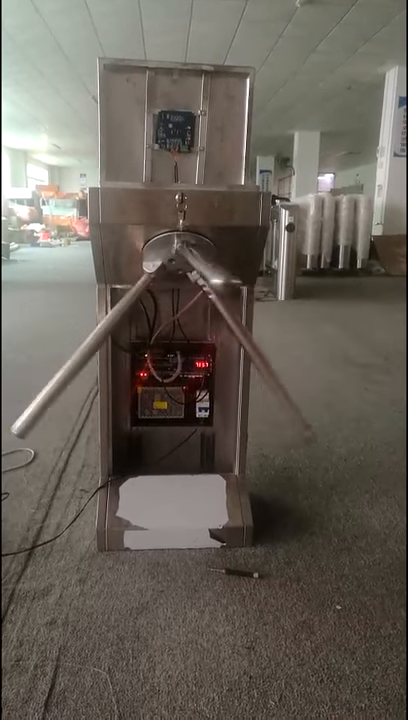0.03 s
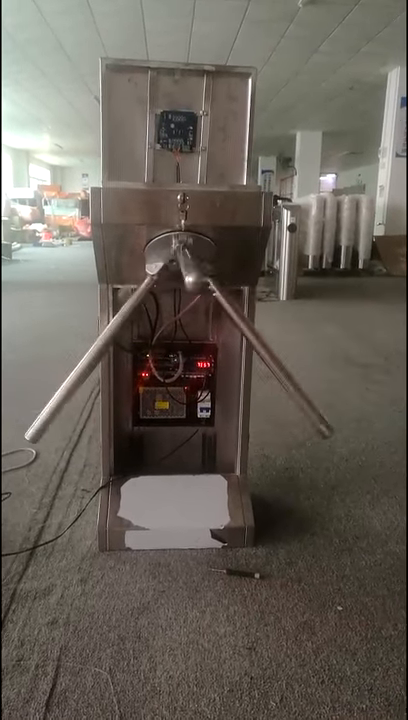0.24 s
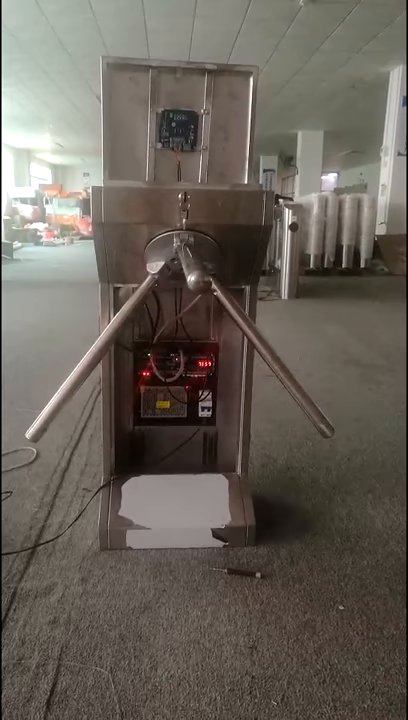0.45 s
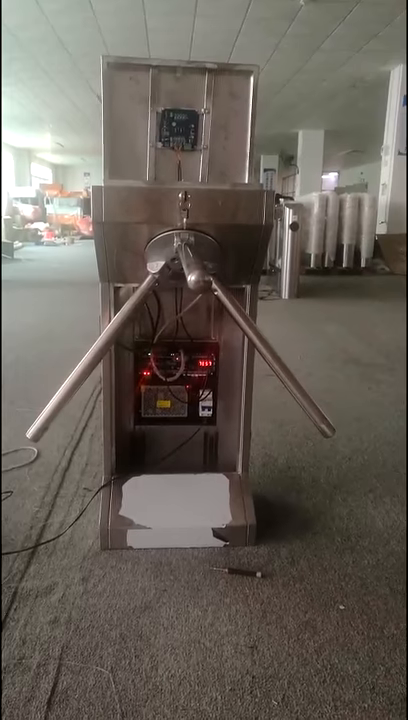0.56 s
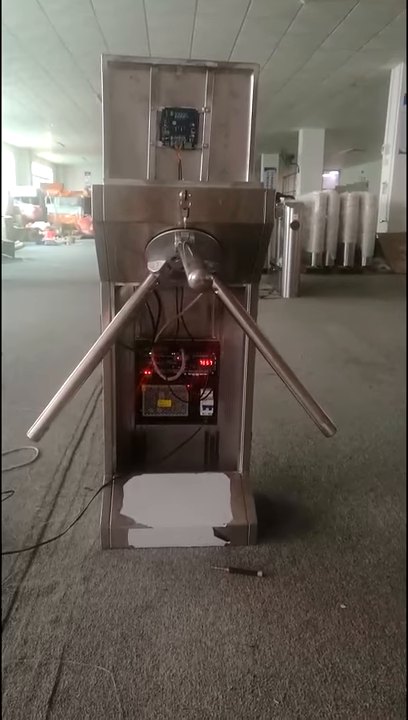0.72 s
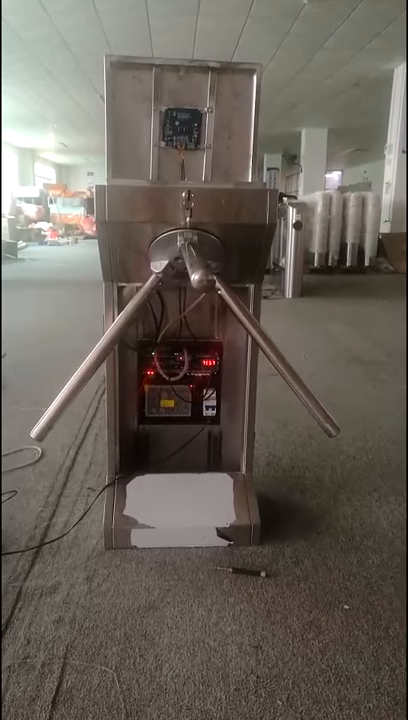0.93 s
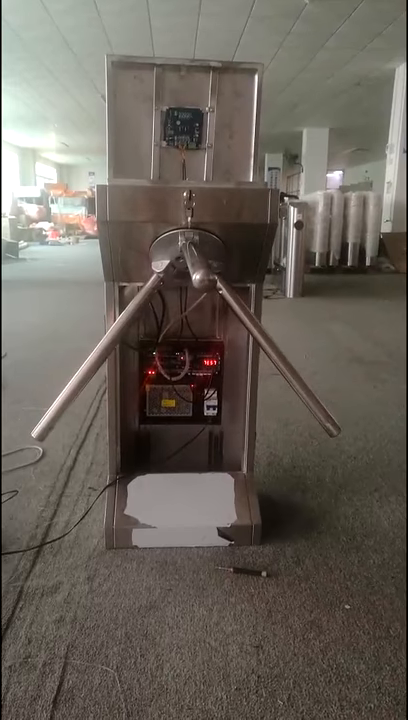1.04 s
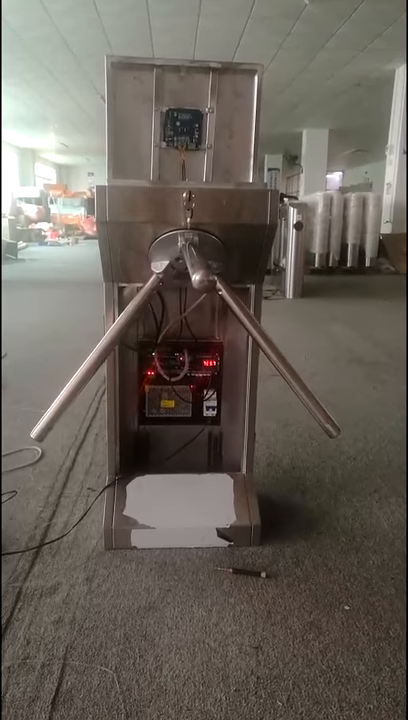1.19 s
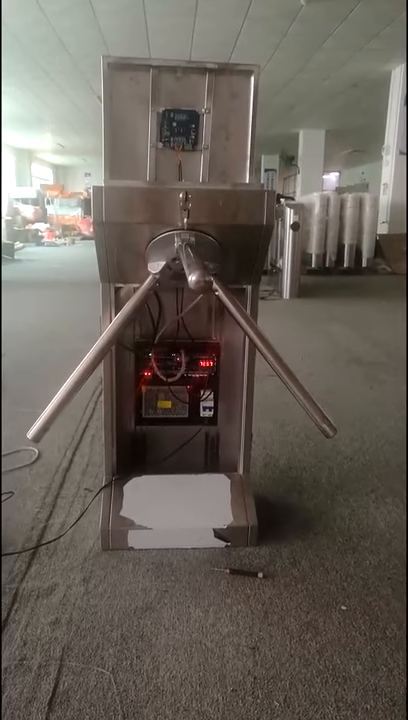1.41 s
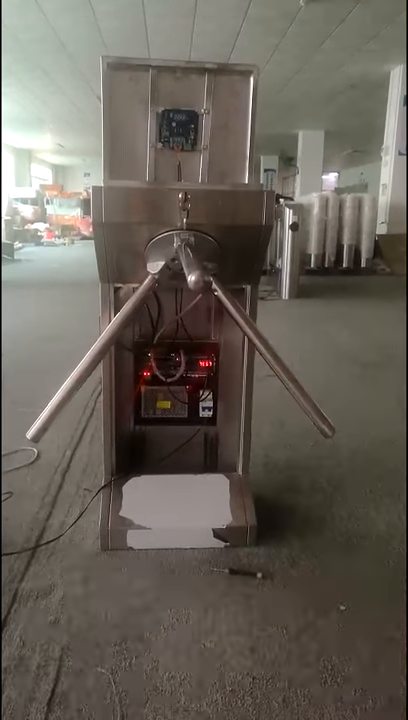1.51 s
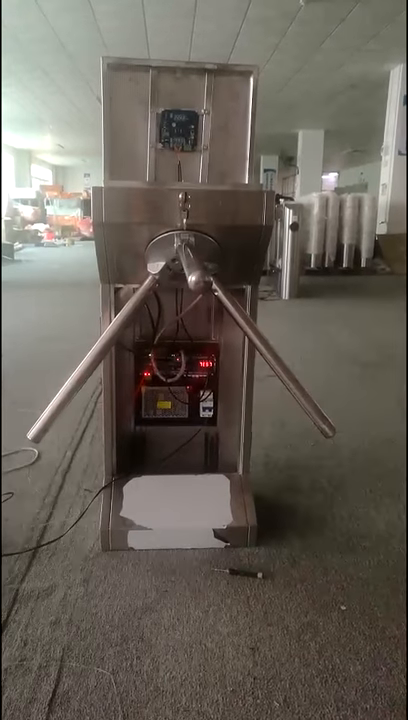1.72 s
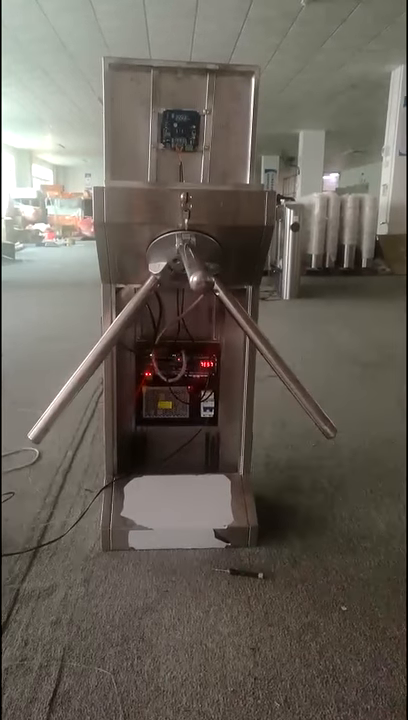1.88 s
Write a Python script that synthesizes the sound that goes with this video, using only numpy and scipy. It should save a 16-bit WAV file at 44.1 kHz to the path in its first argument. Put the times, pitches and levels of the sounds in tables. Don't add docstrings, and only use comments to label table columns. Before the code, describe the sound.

A steel turnstile knocks with a low thud, then clacks loudly over steady distant machine hum

```python
import sys
import numpy as np
from scipy import signal
from scipy.fft import rfft, irfft
from scipy.io import wavfile
from scipy.ndimage import uniform_filter1d

SR = 44100
rng = np.random.default_rng(int(sys.argv[2]) if len(sys.argv) > 2 else 0)


def log_audio(samples):
    frames = np.atleast_2d(samples).T
    limited = np.clip(frames, -1, 1)
    pcm = np.round(limited * 32767).astype(np.int16)
    wavfile.write(sys.argv[1], SR, pcm)


def gain_from_db(level_db):
    decades = np.asarray(level_db, float) / 20
    return 10 ** decades


N = 85995

# frequency in Hz, density in dB per Hz.
HUM_SPECTRUM = [(45, -26.5), (70, -1), (280, -1), (750, -9.5), (2700, -13.5), (4000, -24.5), (9800, -38.5),
                (14000, -44.5)]
# time in seconds, level in dB.
MACHINE_ACTIVITY = [(0, 3), (.2, 3.5), (0.499, 3.5), (.8, 0.5), (1.05, 2), (1.3, 3), (1.74, 2), (1.8, 3)]
# start in seconds, length in seconds, pitch in Hz, level in dB.
SQUEAKS = [
    (.03, .11, 1050, -46.5),
    (.115, 0.03, 1650, -40.5),
    (.45, 0.081, 1372, -49),
    (.53, .05, 1510, -50),
    (.6, 0.039, 1776, -38.5),
    (.645, 0.064, 1780, -46),
    (.5, .04, 1085, -50),
    (1.74, 0.09, 705, -42.5),
]
# start in seconds, frequency in Hz, peak in dB, rise in seconds,
# sharpness as an exponent.
PANEL_SWELLS = [(.195, 137, -19.5, 0.069, 1.5), (.2534, 137, -22.5, 0.063, 1.7),
                (.235, 188, -20, 0.027, 2.2), (.285, 170, -25.5, 0.039, 2.2), (.29, 188, -24.5, 0.029, 1.8),
                (.34, 196, -28.5, 0.03, 1.8), (.4, 142, -38, .04, 1.1), (0.196, 365, -36.5, 0.026, 1.2),
                (.2, 305, -34.5, 0.029, 1.2), (.21, 610, -39.5, 0.029, 1.8), (.335, 295, -32, 0.029, 0.93),
                (.25, 345, -33, .03, 1.2), (0.44, 190, -42.5, 0.036, 1.2), (0, 200, -32, 0.0051, .3),
                (1.335, 352, -25, 0.027, 1.8), (1.385, 315, -29, .02, 1.2), (1.447, 350, -25, 0.034, 1.5),
                (1.44, 535, -30, 0.019, 1.2), (1.44, 170, -33.5, 0.062, 1.8), (1.5, 157, -26.5, 0.017, 1.8),
                (1.53, 215, -28.5, 0.022, 1.8), (1.56, 350, -32, 0.028, 1.2)]
# start in seconds, peak in dB, rise in seconds, sharpness as an exponent.
RUMBLES = [
    (.195, -33.5, 0.043, 0.87),
    (.28, -47, 0.065, 1.8),
    (1.34, -31.5, 0.056, 1.5),
    (1.41, -30.5, 0.066, 1.6),
    (1.52, -35.5, 0.1, 1.46),
    (1.77, -42.5, 0.035, 1.7),
]
# frequency in Hz, level in dB.
RUMBLE_COLOUR = [(50, -31.5), (110, -5), (200, 2), (380, -0.5), (600, -6.5), (1000, -13.5), (2000, -48)]
# start in seconds, peak in dB, rise in seconds, sharpness as an exponent.
BEARING_RUBS = [
    (.1, -57.5, .06, 1.5),
    (.38, -57.5, 0.16, 0.78),
]
# frequency in Hz, level in dB.
BEARING_COLOUR = [(2500, -35), (4800, -4.5), (6800, -2.5), (8200, -13.5), (11000, -23)]

# frequency in Hz, level in dB, t60 in seconds.
PAWL_MODES = [(2602, 7.5, 0.026), (4610, 0.5, 0.046), (4700, -3, .03), (7400, 0, .012), (7500, 1, 0.014)]
# frequency in Hz, level in dB, t60 in seconds.
STOP_MODES = [(760, -2.5, 0.03), (1095, 2, 0.039), (1290, 4.5, 0.027), (1803, -0.5, 0.044),
              (2200, -9.5, .04), (4700, -7, .06), (5050, -6, .02), (6250, -12.5, .015), (9240, -27, .012),
              (12300, -21.5, .01)]
# frequency in Hz, level in dB, t60 in seconds.
REBOUND_MODES = [(6570, 1.5, 0.0087), (8900, -8, 0.01), (11100, -11, .006), (13500, -16, .006)]
# frequency in Hz, level in dB, t60 in seconds.
BOLT_MODES = [(1395, -10.5, 0.053), (2126, 4, .08), (2501, 1.5, 0.072), (2625, -6, .03), (3980, -5.5, .02),
              (7910, -8, .03), (9350, -31.5, .02)]
# frequency in Hz, level in dB, t60 in seconds.
PLATE_MODES = [(1170, -13.5, .04), (1750, -3, 0.072), (1970, -5.5, 0.14), (2102, 4, 0.062), (2590, -5, .05),
               (2700, -5, .05), (3605, -3, 0.039), (4740, -22.5, .02), (5430, -8.5, .02),
               (5600, -7.5, 0.03), (6780, -14.5, .02), (7700, -26, .02), (12200, -22, .008)]
# start in seconds, ring in dB, crack in dB, contact in seconds, rattle t60 in seconds.
PAWL_HITS = [
    (.182, -36, -42, 0.0058, 0.075),
]
# start in seconds, ring in dB, crack in dB, contact in seconds, rattle t60 in seconds.
STOP_HITS = [
    (.198, -36.5, -41.5, 0.0034, 0.052),
    (.21, -29.5, -35, 0.0044, 0.22),
]
# start in seconds, ring in dB, crack in dB, contact in seconds, rattle t60 in seconds.
REBOUND_HITS = [
    (.403, -38, -45, .003, 0.037),
]
# start in seconds, ring in dB, crack in dB, contact in seconds, rattle t60 in seconds.
BOLT_HITS = [
    (1.3285, -27, -38, .004, 0.043),
    (1.334, -18, -31, 0.0015, 0.07),
]
# start in seconds, ring in dB, crack in dB, contact in seconds, rattle t60 in seconds.
PLATE_HITS = [
    (1.346, -21, -20.5, 0.0032, .04),
    (1.3535, -21, -21, .0015, .04),
    (1.365, -27, -31.5, .003, .12),
    (1.392, -31, -37.5, .004, 0.34),
    (1.462, -39.5, -43, .004, .15),
]
# frequency in Hz, level in dB.
CRACK_COLOUR = [(300, -25), (1000, -4.5), (2300, 6.5), (3200, -10), (6000, -3.5), (8000, -12),
                (9700, -21.5), (14000, -37)]
# frequency in Hz, t60 in seconds.
HALL_T60 = [(150, .9), (400, 1.4), (1000, 1.1), (2500, 0.63), (6000, 0.44), (12000, .35)]


def read(points, hz):
    f, value = np.transpose(points)
    return np.interp(np.log(hz + 1), np.log(f + 1), value)


def evened(x):
    return x / np.sqrt(np.mean(x ** 2) + 1e-20)


def add(mix, start, sound):
    part = mix[max(round(start * SR), 0):][:len(sound)]
    part += sound[:len(part)]


def coloured(x, points):
    gain = gain_from_db(read(points, np.fft.rfftfreq(len(x), 1 / SR)))
    return irfft(rfft(x) * gain, len(x))


def swell(t, rise, sharp):
    return (t / rise * np.exp(.5 - .5 * (t / rise) ** 2)) ** sharp


def gusts(rows, colour):
    level = np.zeros(N)
    t = np.arange(SR // 2) / SR
    for start, db, rise, sharp in rows:
        add(level, start, gain_from_db(db) * swell(t, rise, sharp))
    return level * evened(coloured(rng.standard_normal(N), colour))


def hum():
    frames, hz = N // 256 + 5, np.fft.rfftfreq(1024, 1 / SR)
    real, imaginary, patches = rng.standard_normal((frames, 513, 3)).T
    patches = uniform_filter1d(patches, size=8, axis=0)
    patches = evened(uniform_filter1d(patches, size=12, axis=1))
    level_db = read(HUM_SPECTRUM, hz)[:, None] + 1.47 * patches
    spectrum = (real + 1j * imaginary) * gain_from_db(level_db)
    noise = signal.istft(spectrum, nperseg=1024, noverlap=768)[1][:N]
    activity_db = np.interp(np.arange(N) / SR, *np.transpose(MACHINE_ACTIVITY))
    return gain_from_db(-40.5 + activity_db) * evened(noise)


def cabinet():
    out = gusts(RUMBLES, RUMBLE_COLOUR)
    t = np.arange(SR // 2) / SR
    for start, hz, db, rise, sharp in PANEL_SWELLS:
        add(out, start, gain_from_db(db) * swell(t, rise, sharp) * np.sin(2 * np.pi * hz * t))
    return out


def squeaks():
    out = np.zeros(N)
    for start, length, hz, db in SQUEAKS:
        t = np.arange(0, length, 1 / SR)
        drift = uniform_filter1d(rng.standard_normal((2, SR // 5)), size=500)
        waver, flutter = drift[:, :len(t)]
        pitch = hz * (1 + 0.43 * waver + .25 * (t - length / 2))
        tone = np.sin(2 * np.pi * np.cumsum(pitch) / SR)
        fade = np.sin(np.pi * t / length) ** 0.47
        add(out, start, gain_from_db(db + 82 * flutter) * fade * tone)
    return out


def bearing():
    return gusts(BEARING_RUBS, BEARING_COLOUR)


def blows(hits, modes):
    out = np.zeros((2, N))
    t = np.arange(SR // 3) / SR
    ring = sum(gain_from_db(db - 60 * t / t60) * np.sin(2 * np.pi * hz * t) for hz, db, t60 in modes)
    ring = ring * (1 - np.exp(-t / .00025))
    for start, ring_db, crack_db, contact, rattle in hits:
        noise = rng.standard_normal((2, len(t)))
        shape = np.minimum(t / contact, 1) ** 2 * gain_from_db(-60 * t / rattle)
        push = noise[0] * shape
        push = push / np.linalg.norm(push)
        crack = evened(coloured(noise[1], CRACK_COLOUR)) * shape / shape.max()
        add(out[0], start, gain_from_db(ring_db) * signal.fftconvolve(push, ring)[:len(t)])
        add(out[1], start, gain_from_db(crack_db) * crack)
    return out


def arm():
    return blows(PAWL_HITS, PAWL_MODES) + blows(STOP_HITS, STOP_MODES) + blows(REBOUND_HITS, REBOUND_MODES)


def lock():
    return blows(BOLT_HITS, BOLT_MODES) + blows(PLATE_HITS, PLATE_MODES)


def hall(x):
    hz, t, z = signal.stft(rng.standard_normal(SR), SR, nperseg=256)
    decay = gain_from_db(-60 * t / read(HALL_T60, hz)[:, None])
    tail = signal.istft(z * decay, SR, nperseg=256)[1]
    tail = tail * np.clip((np.arange(len(tail)) / SR - .008) / 0.012, 0, 1)
    return signal.fftconvolve(x, tail / np.linalg.norm(tail))[:N]


def scene():
    background = hum() + squeaks() + bearing()
    boom = cabinet()
    ring, crack = arm() + lock()
    hall_db, ring_hall_db, boom_hall_db = -5, -6.5, -23
    wet = hall(gain_from_db(hall_db) * (crack + gain_from_db(ring_hall_db) * ring) + gain_from_db(boom_hall_db) * boom)
    return (background + ring + crack + boom + wet)[None]


def treble_dropouts(x):
    gate_hz, gate_share, gate_db = 8200, 1, -12
    hz, t, z = signal.stft(x, SR, nperseg=2048)
    power = uniform_filter1d(abs(z) ** 2, size=6, axis=1)
    around = uniform_filter1d(power, size=60, axis=1) + 1e-20
    weak = np.clip((gate_share - power / around) / 0.19, 0, 1)
    gain = gain_from_db(gate_db * weak * (hz > gate_hz)[:, None])
    return signal.istft(z * gain, SR, nperseg=2048)[1][:, :N]


def roll_off(x):
    return signal.sosfilt(signal.butter(12, 14540, fs=SR, output="sos"), x)


def record(dry):
    low_cut_hz, edge_hz, end_s = 55, 13900, 1.804
    low_cut = signal.butter(3, low_cut_hz, "high", fs=SR, output="sos")
    x = signal.sosfilt(low_cut, treble_dropouts(dry))
    band_limit = signal.firwin(511, edge_hz, window=("kaiser", 9), fs=SR)
    x = signal.oaconvolve(x, band_limit[None], "same")
    return roll_off(x * (np.arange(N) < end_s * SR))


dry = scene()
out = record(dry)
log_audio(out)
```